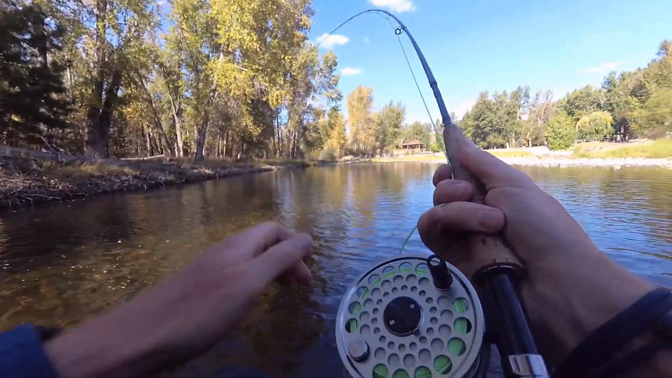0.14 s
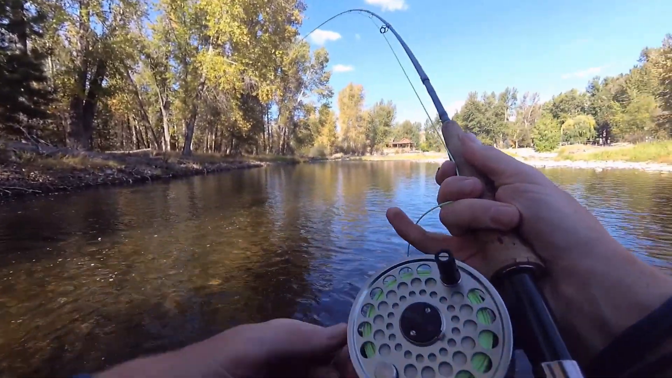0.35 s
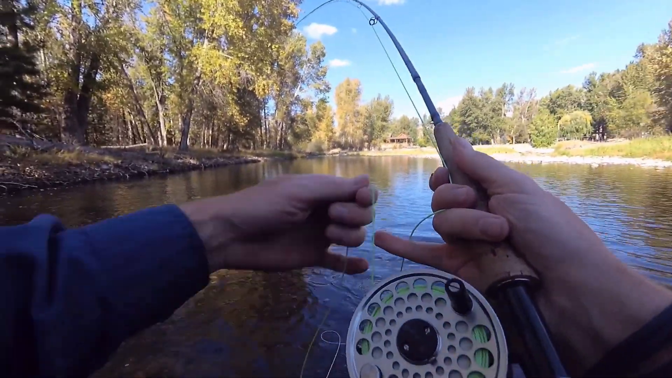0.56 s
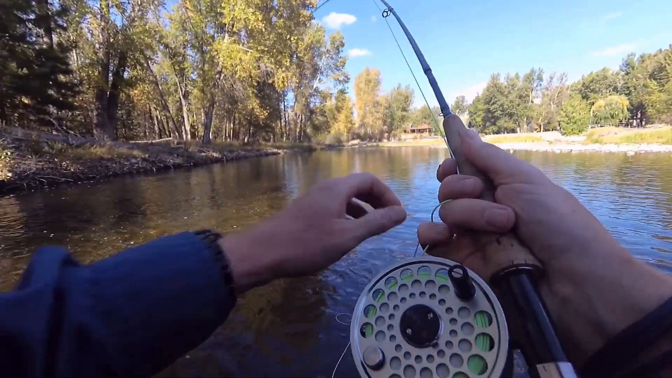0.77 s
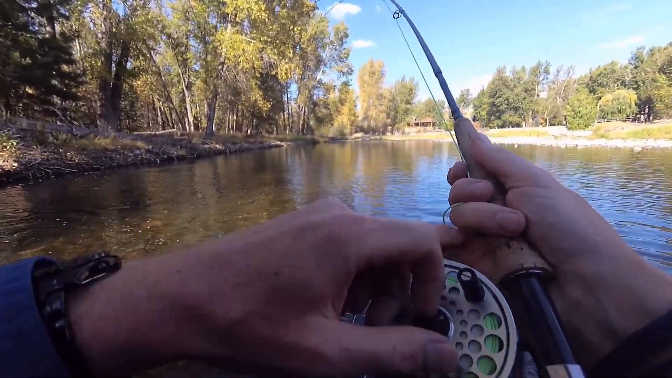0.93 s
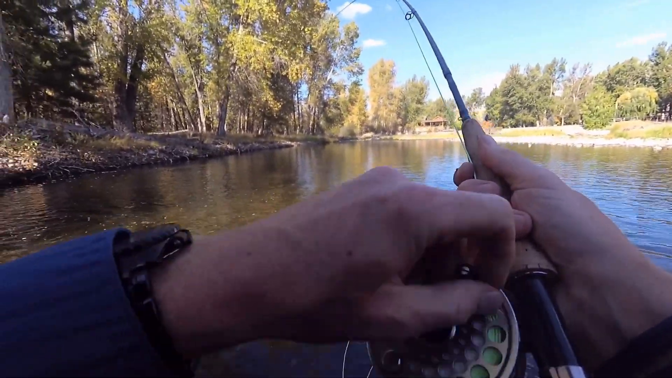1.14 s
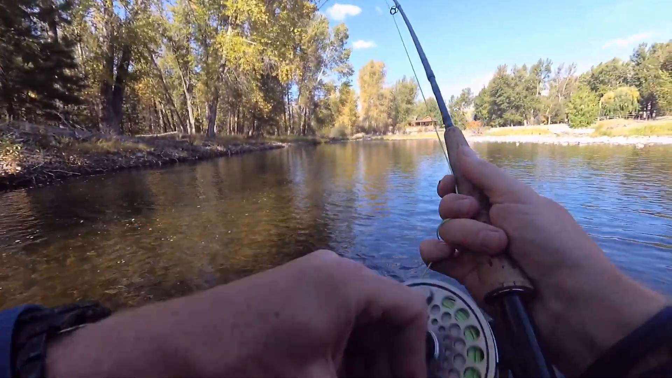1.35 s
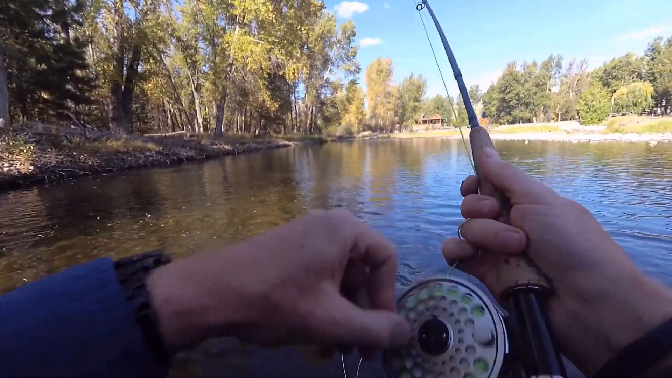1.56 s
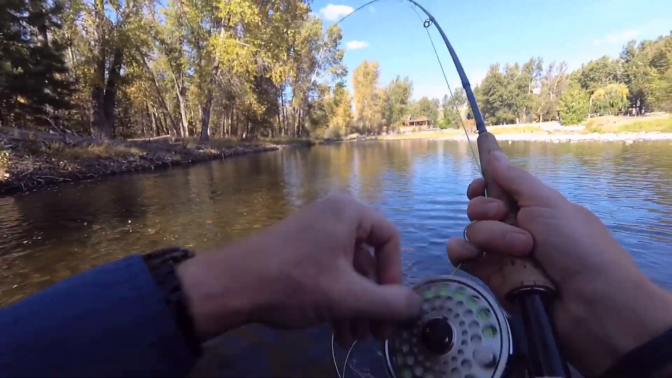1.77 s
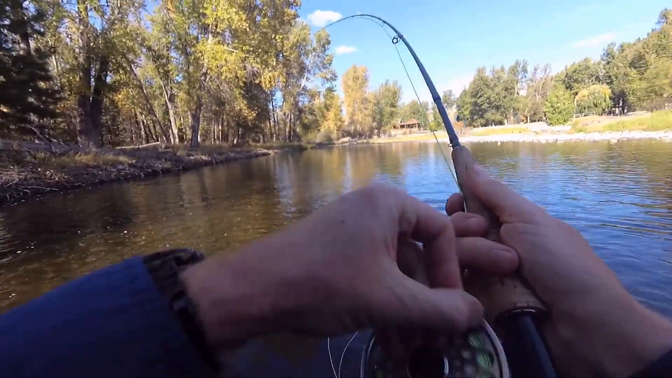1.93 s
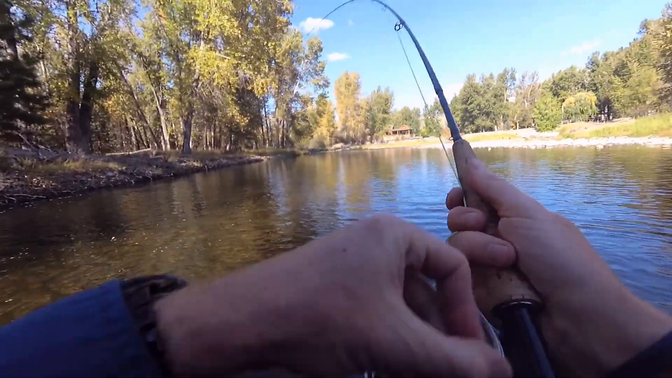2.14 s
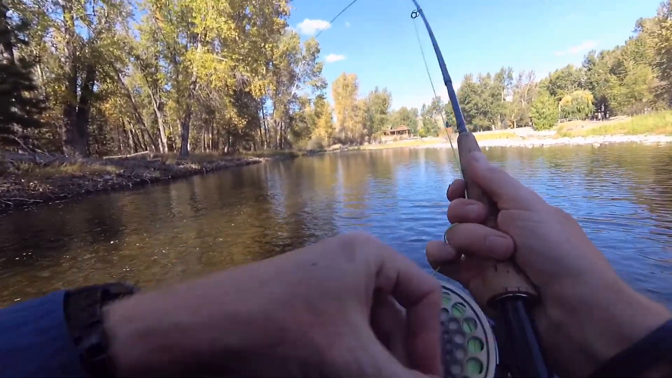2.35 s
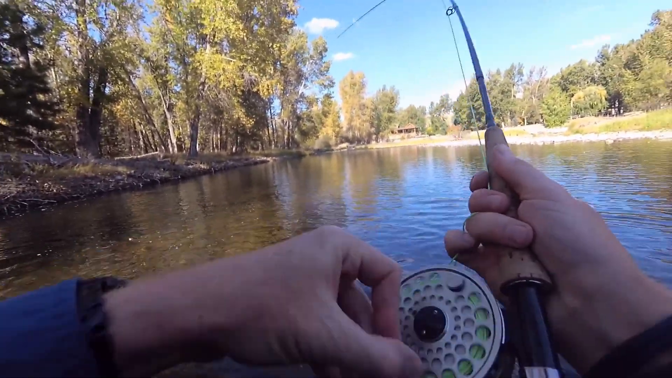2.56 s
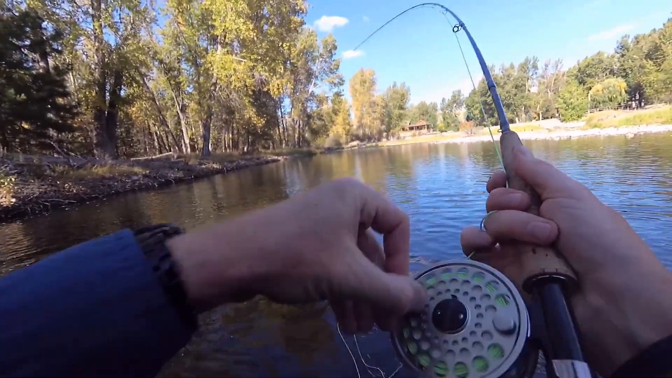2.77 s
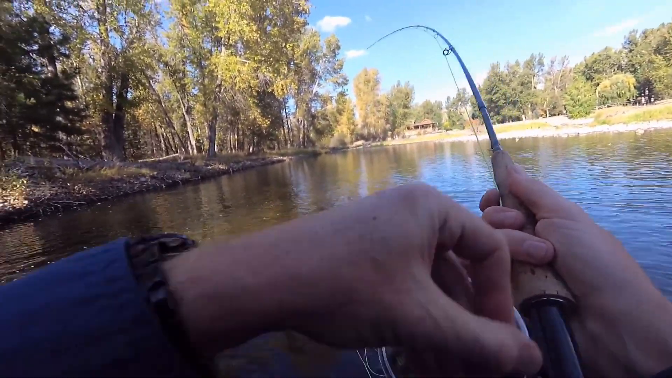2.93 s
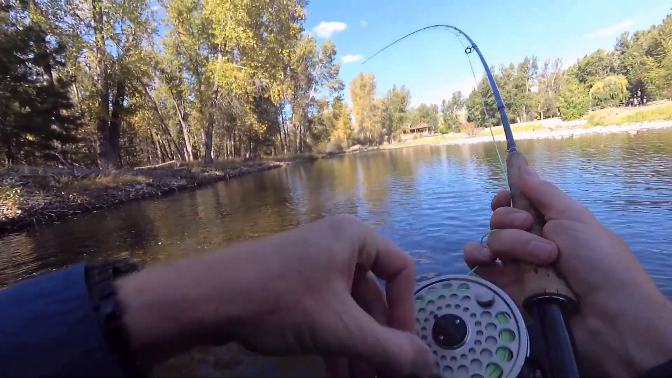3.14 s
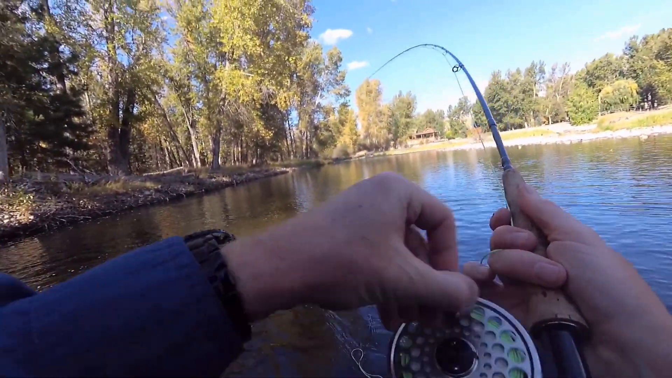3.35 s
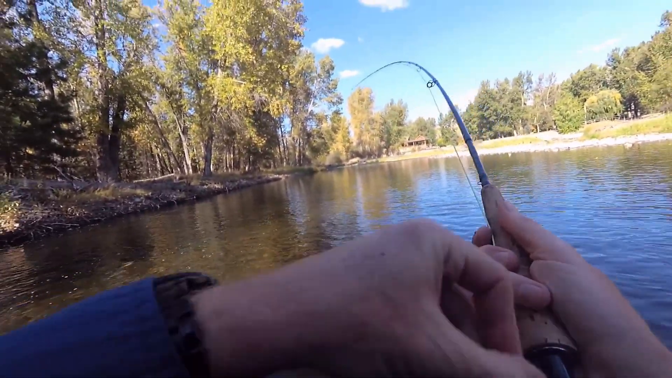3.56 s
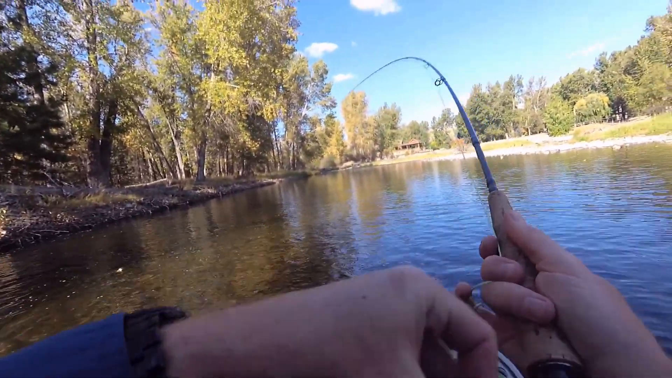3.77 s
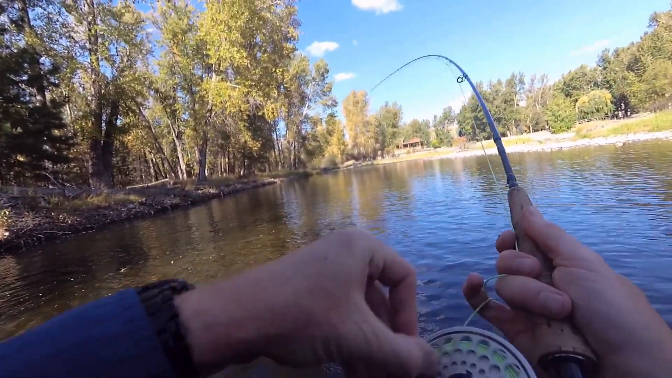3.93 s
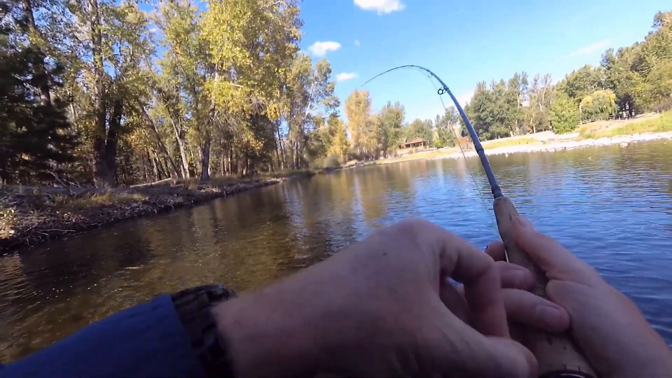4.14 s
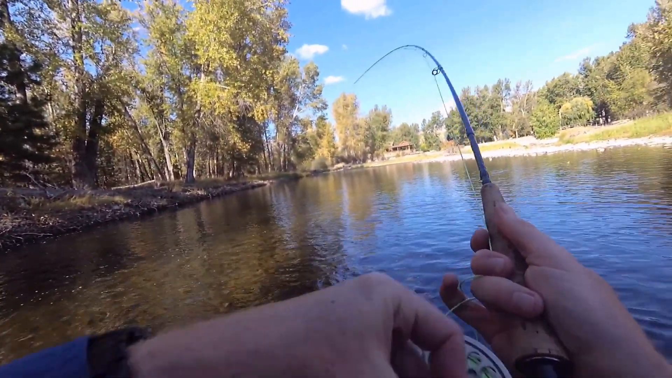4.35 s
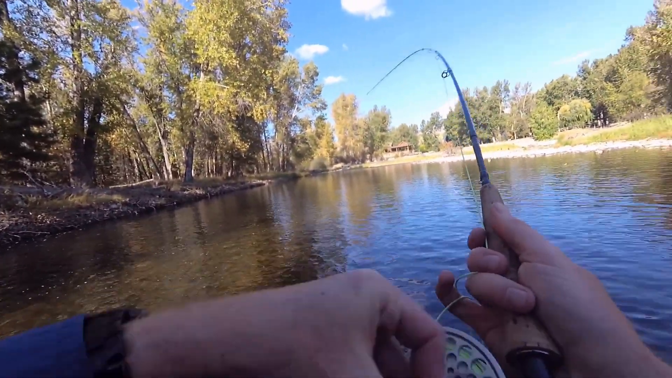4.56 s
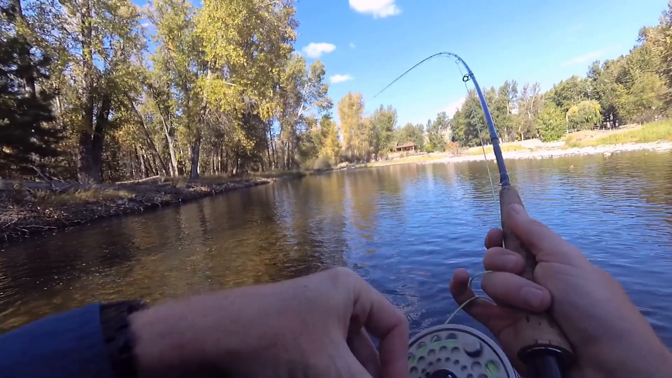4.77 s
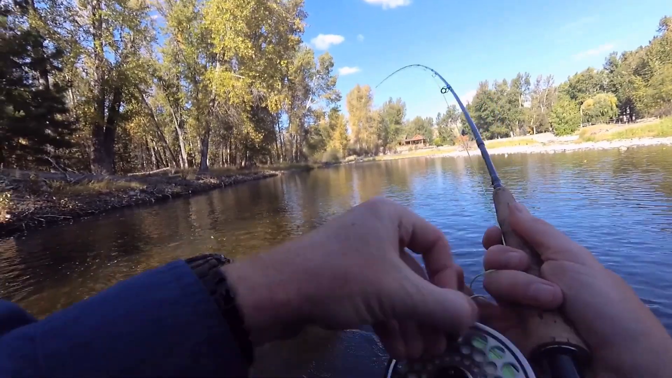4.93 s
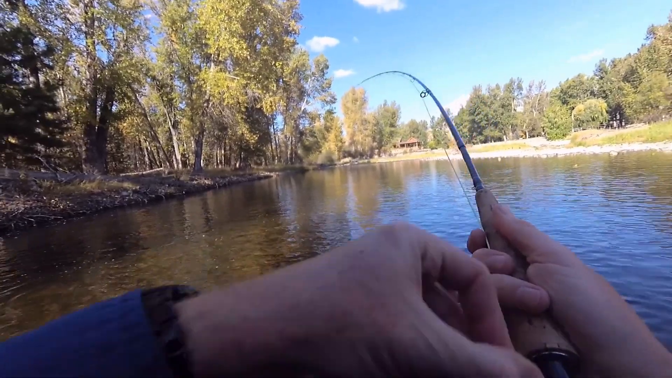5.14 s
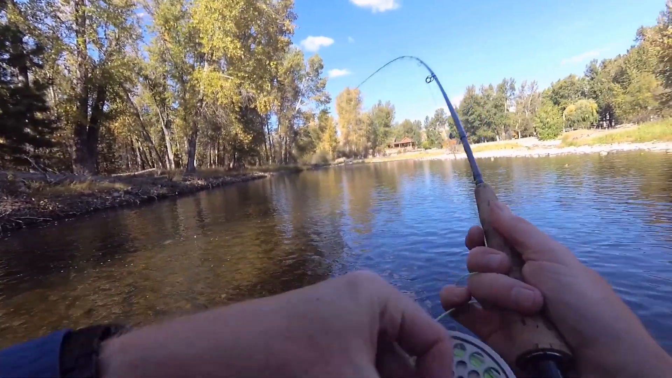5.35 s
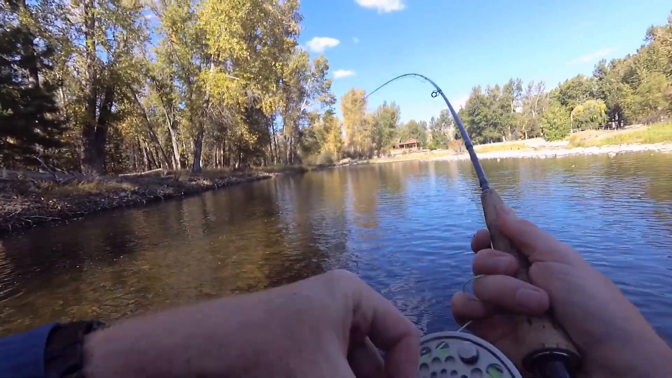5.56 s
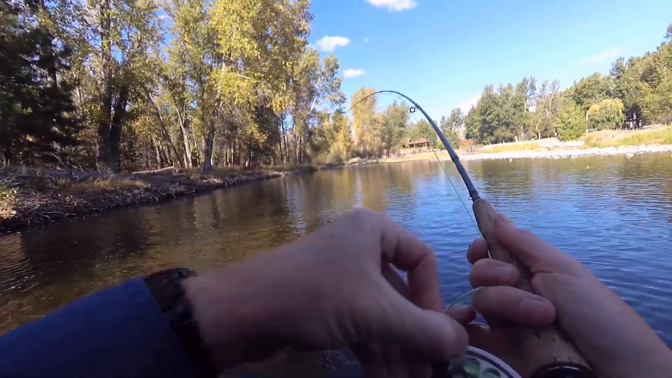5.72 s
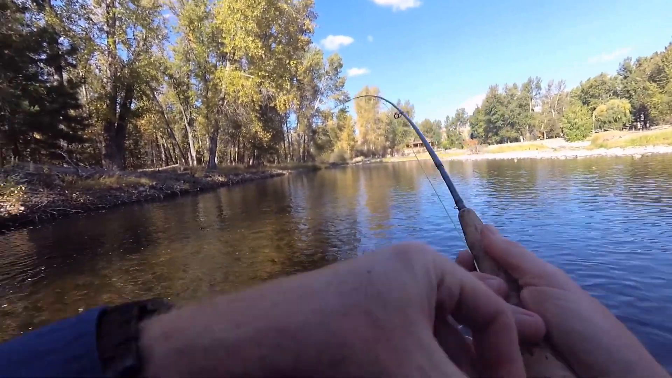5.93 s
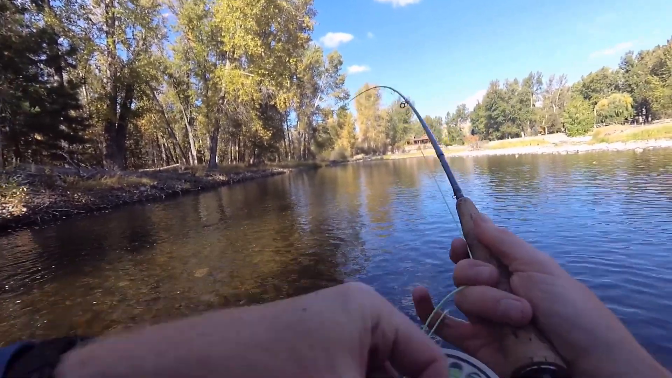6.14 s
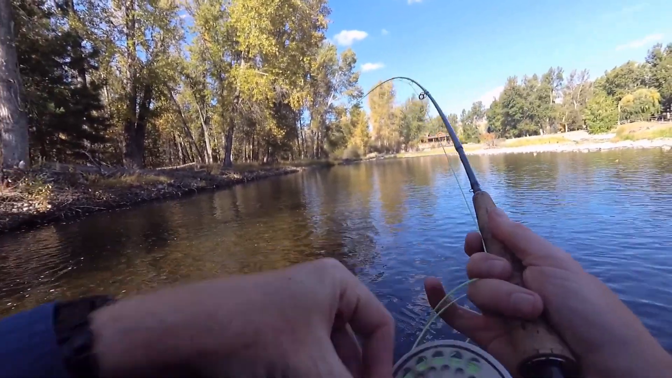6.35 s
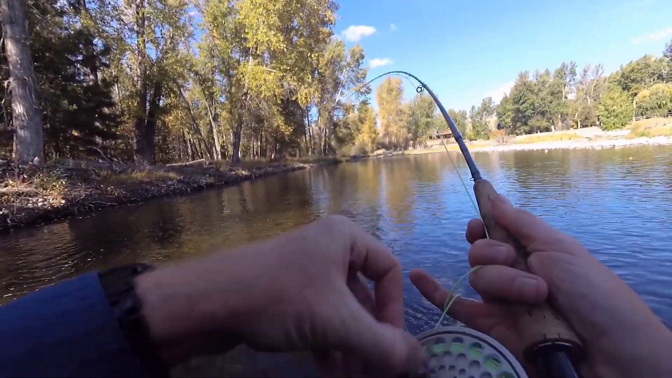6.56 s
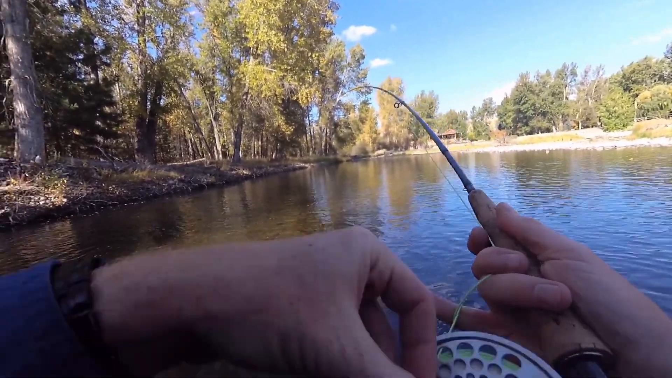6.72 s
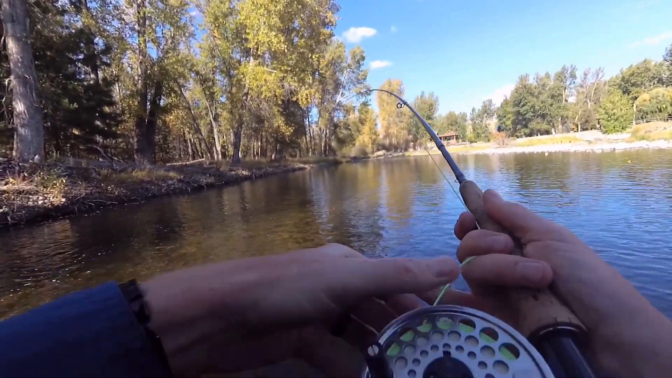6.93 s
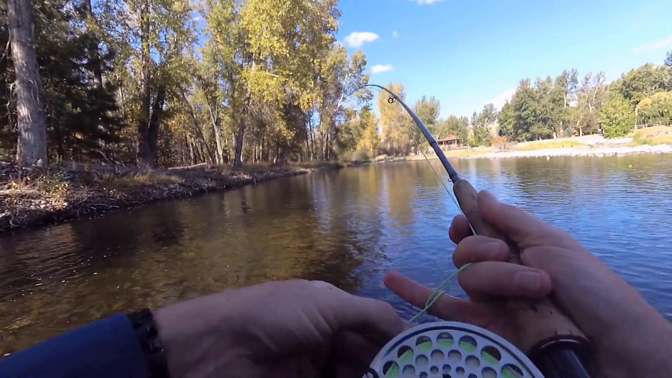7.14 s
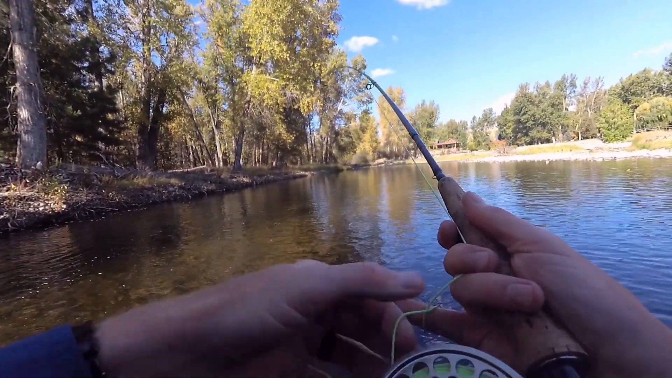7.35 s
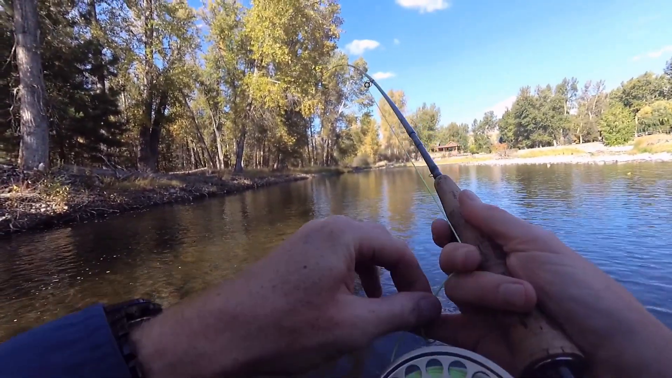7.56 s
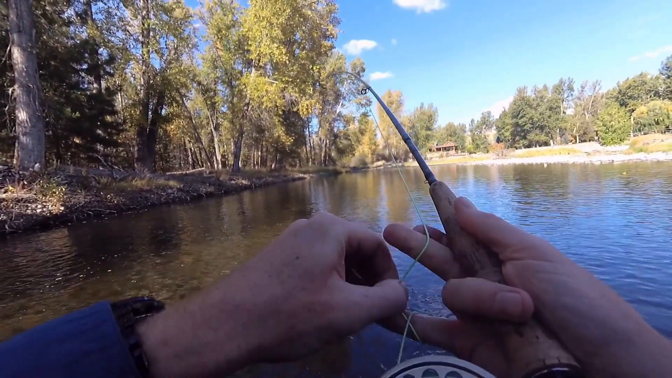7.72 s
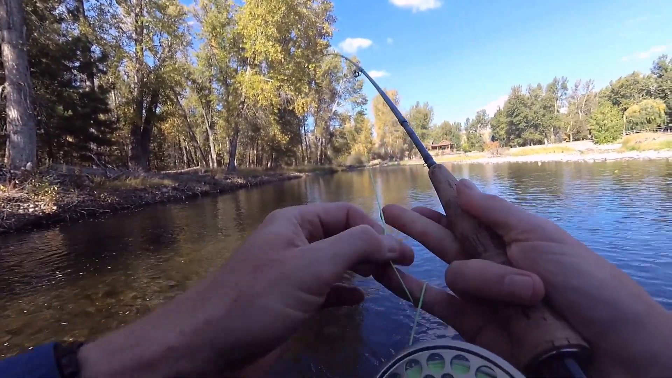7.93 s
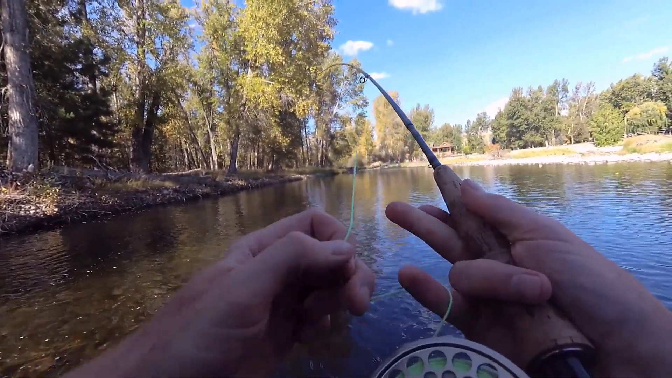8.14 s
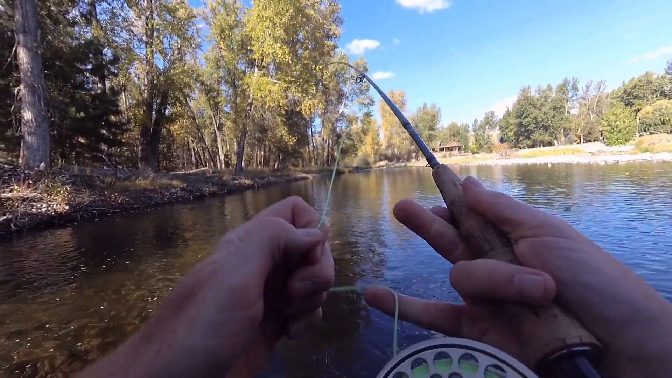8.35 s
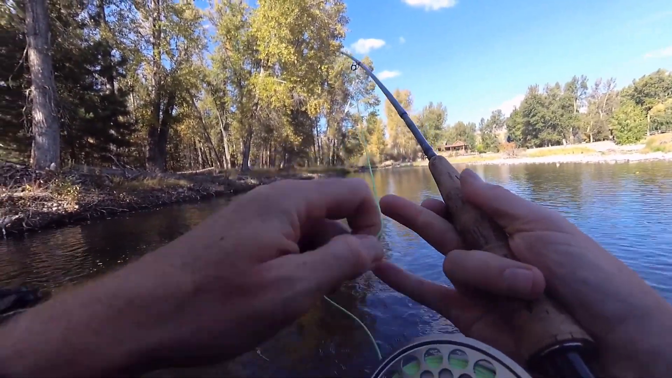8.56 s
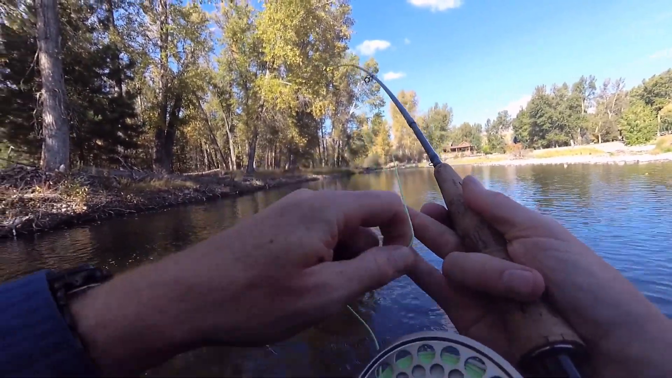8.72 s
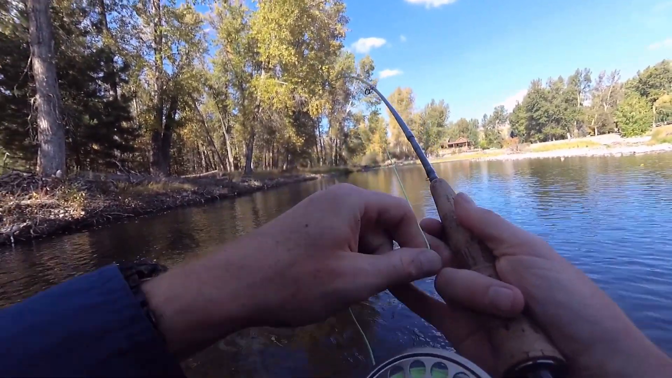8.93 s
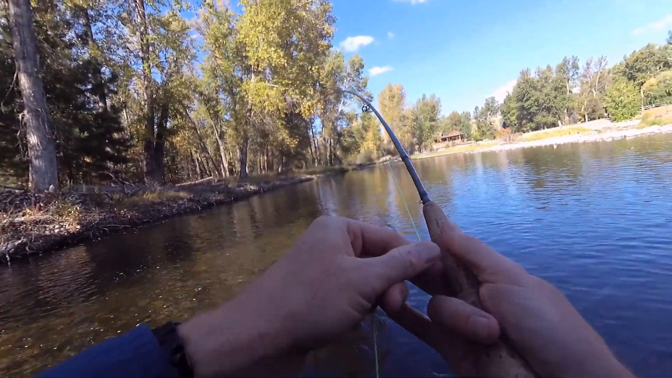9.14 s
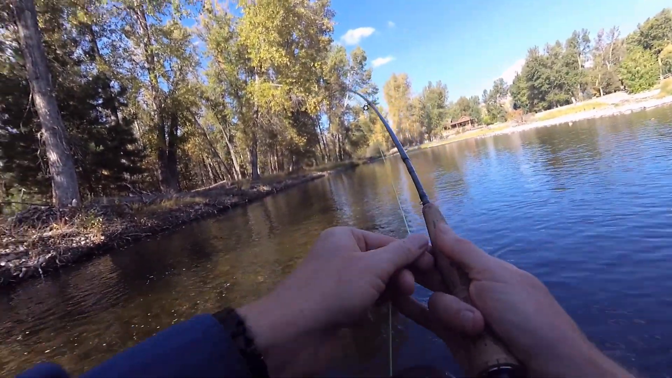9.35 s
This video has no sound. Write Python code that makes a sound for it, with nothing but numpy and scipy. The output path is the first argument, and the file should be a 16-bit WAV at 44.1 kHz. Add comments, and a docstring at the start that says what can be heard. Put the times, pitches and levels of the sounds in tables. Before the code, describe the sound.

Close to the microphone, small finger taps and a brushing sleeve come first over quiet flowing water. A bright ratcheting buzz then starts abruptly, roughly thirty to fifty clicks a second, its pace rippling with the cranking hand, with faint scraping and a few knocks. After it ends, a soft bump's aftermath gives way to steel tinks, taps, a short line swish and the river alone.

```python
"""Beside a steadily rushing river, an angler winds a click-and-pawl fly reel at arm's length from a body camera.
Each click is a short noise burst that rings the spool, rim and pawl; listed times slow at the crank's dead points.
Grainy noise makes the scrape between teeth, tiny ticks make the rattle, and falling tones make the crank knocks.
Noise bursts make the taps, slides and bumps of hands and sleeve, and steel tinks ring as fading sines.
The river is shaped noise whose bands swell separately, under a thin hiss."""
import sys
import numpy as np
from scipy import signal
from scipy.fft import rfft, irfft, next_fast_len
from scipy.io import wavfile
from scipy.ndimage import map_coordinates

SR = 44100
rng = np.random.default_rng(int(sys.argv[2]) if len(sys.argv) > 2 else 0)


def pcm_store(signal):
    """Save signal as 16-bit PCM."""
    levels = np.round(np.clip(np.atleast_2d(signal), -1, 1) * 32767)
    wavfile.write(sys.argv[1], SR, levels.astype(np.int16).T)


N = 414099

# resonances of the reel's spool: pitch_hz, width_hz, level_db (relative)
SPOOL_MODES = [(3000, 430, 2.5), (3400, 583, 2.5)]
# resonance of the spool's rim: pitch_hz, width_hz, level_db (relative)
RIM_MODES = [(4120, 250, 0.36)]
# side load on the spool, which changes the rubbing: time_s, rub_db (relative)
SIDE_LOAD = [(1.4, -6.5), (2.2, -2.5), (3.3, -5.5), (4.2, -3.5), (4.5, -0.5), (5.1, -2), (6.8, -5)]


def amp(db):
    """Turns decibels into a plain multiplier."""
    return 10 ** (np.asarray(db) / 20)


def unit(x):
    """Scales a sound to an rms of 1."""
    return x / np.sqrt(np.mean(x ** 2) + 1e-20)


def along(points, hz):
    """Reads a curve of (Hz, value) points on a log frequency axis."""
    f, v = np.transpose(points)
    return np.interp(np.log(hz + 1), np.log(f + 1), v)


def over_time(points):
    """Reads a curve of (second, value) points at every sample."""
    return np.interp(np.arange(N) / SR, *np.transpose(points))


def wobble(rate):
    """A smooth random curve with this many random knots a second."""
    knots = rng.standard_normal(int(N * rate / SR) + 4)
    return map_coordinates(knots, [np.arange(N) * rate / SR])


def filtered(x, response):
    """Multiplies the spectrum of x by a response, which may be complex."""
    n = x.shape[-1]
    m = next_fast_len(n + n // 8)  # spare room for the ringing
    return irfft(rfft(x, m) * response(np.fft.rfftfreq(m, 1 / SR)), m)[..., :n]


def resonances(modes, f):
    """Damped resonances that ring only after being struck, added with alternating signs."""
    total = 0
    for k, (centre, width, db) in enumerate(modes):
        damping = 1j * f * width
        total = total + (-1) ** k * amp(db) * damping / (centre * centre - f * f + damping)
    return total


def ports(pair, alike):
    """Mixes two unrelated signals into a left and right of a given likeness."""
    turn = np.arccos(np.clip(alike, -1, 1)) / 2
    return np.array([np.cos(turn) * pair[0] + sign * np.sin(turn) * pair[1] for sign in (1, -1)])


def add(out, s, sound):
    """Mixes a stereo sound in at time s."""
    part = out[:, max(round(s * SR), 0):][:, :sound.shape[-1]]
    part += sound[..., :part.shape[-1]]


def band(n, hz, width, alike=0.26):
    """Stereo noise of rms 1 in one band around hz."""
    noise = ports(rng.standard_normal((2, n)), alike)

    def hump(f):
        return f / np.hypot(f, hz / 2) / np.hypot(1, (2 * (f - hz) / width) ** 2)
    return unit(filtered(noise, hump))


def rush(colour):
    """Spread-out stereo noise of rms 1, nearly mono in the low middle."""
    # left-right likeness of the noise: pitch_hz, likeness (0 to 1)
    likeness = [(50, 0.13), (130, 0.86), (270, 0.99), (640, 0.97), (1400, 0.87), (3100, 0.26), (6800, 0.5),
                (15000, 1)]
    m = next_fast_len(N)
    hz = np.fft.rfftfreq(m, 1 / SR)
    pair = rfft(rng.standard_normal((2, m)))
    spectrum = ports(pair, along(likeness, hz)) * colour(hz)
    return unit(irfft(spectrum, m)[:, :N])


def river(flow_db=-39.0, hiss_db=-55.5, churn_db=1.5, count=4):
    """Water is a broad low rush whose octaves swell and sink separately, under a thin even hiss."""
    # tone colour of the rush: pitch_hz, level_db (per Hz, relative)
    flow_colour = [(30, -45), (60, -31), (110, -24.5), (170, -14), (260, -3.5), (420, -2), (620, -6.5),
                   (850, -11.5), (1050, -15.5), (1750, -18), (2200, -24), (3000, -32), (6000, -86)]
    # tone colour of the hiss: pitch_hz, level_db (per Hz, relative)
    hiss_colour = [(1200, -9), (2500, 8), (4000, 8.5), (6200, 3), (7500, 5.5), (9500, 5), (11000, 11.5),
                   (12200, 3), (15200, 5), (15900, -25)]
    flow = rush(lambda f: amp(along(flow_colour, f)))
    centres = 200 * 2 ** np.arange(count)  # Hz
    water = np.zeros((2, N))
    for share in np.eye(count):
        octave = filtered(flow, lambda f: np.interp(f, centres, share))
        water += octave * amp(churn_db * wobble(16))
    hiss = rush(lambda f: amp(along(hiss_colour, f)))
    return amp(flow_db) * water + amp(hiss_db) * hiss


def handling(lumps_db=4.0):
    """Arm movement shakes the camera with a faint lumpy rumble, different at each port."""
    # strength of the rumble, before its lumps: time_s, level_db
    rumble_level = [(.8, -58), (1.25, -85), (2.1, -70), (6.8, -56.5), (7.3, -69)]
    # rumble through the camera mount: pitch_hz, level_db (per Hz, relative)
    mount_colour = [(15, -19), (80, -2), (170, 8), (1000, -80)]
    noise = ports(rng.standard_normal((2, N)), 0.67)
    shake = filtered(noise, lambda f: amp(along(mount_colour, f)))
    return amp(over_time(rumble_level) + lumps_db * wobble(5.2)) * unit(shake)


def strokes(rows, grain_db, catch_rate):
    """Soft contacts are bands of noise that swell and fade, catching unevenly as they go."""
    out, t = np.zeros((2, N)), np.arange(SR) / SR - .5
    for s, db, half, hz, width in rows:
        noise = band(SR, hz, width, alike=.45)
        sound = amp(db) * np.exp(-(t / half) ** 2) * noise
        cut = max(round((.5 - s) * SR), 0)  # drop what falls before time zero
        add(out, s - .5, sound[:, cut:])
    return out * unit(amp(grain_db * wobble(catch_rate)))


def bumps():
    """The arm bumps the camera harness: short, low strokes."""
    # bumps, with levels before the unevenness: middle_s, level_db, half_length_s, pitch_hz, width_hz
    bump_rows = [(.83, -44, 0.026, 150, 110), (3.94, -45, 0.021, 192, 130), (6.518, -32.5, 0.029, 168, 106),
                 (6.665, -42, 0.04, 121, 80)]
    return strokes(bump_rows, grain_db=1, catch_rate=40)


def slides():
    """Line and sleeve slide with a fine-grained rustle."""
    # slides, with levels before the grain: middle_s, level_db, half_length_s, pitch_hz, width_hz
    slide_rows = [(.2, -51.5, 0.41, 10300, 9000), (.195, -53, 0.03, 12000, 6000),
                  (.33, -47, 0.14, 1300, 3240), (.75, -50, 0.09, 10500, 7250), (1, -56, 0.17, 10500, 9000),
                  (6.88, -54, 0.27, 7860, 10100), (7.234, -46.5, 0.017, 4530, 8100),
                  (7.89, -53, 0.016, 4500, 4000), (8.112, -42.5, 0.0088, 4740, 2600),
                  (8.128, -44, .0025, 4800, 4500), (8.2, -49.5, 0.03, 2800, 2600),
                  (9.22, -57.5, 0.11, 4000, 4000), (9.33, -55, 0.3, 12000, 9000)]
    return strokes(slide_rows, grain_db=2.5, catch_rate=700)


def taps(tap_db=-1, tap_strike=0.54, fade_s=0.015):
    """Fingers and line tap the rod; each blow rings one broad resonance, quickly damped by the hand."""
    # taps, with levels before tap_db: start_s, level_db, pitch_hz, width_hz
    tap_rows = [(.2, -27, 1490, 1160), (.393, -32, 8000, 6000), (.424, -31, 1890, 1400),
                (.6447, -30, 9500, 3000), (0.6459, -19.5, 5000, 1000), (0.654, -30, 1500, 2000),
                (0.668, -24.5, 895, 700), (0.6696, -32, 9000, 11000), (0.735, -34, 12500, 5000),
                (1.321, -34, 4800, 5100), (3.931, -23, 495, 800), (6.9022, -26.5, 9000, 12000),
                (6.9193, -28, 2460, 2000), (7.191, -27.5, 2680, 1890), (7.296, -36, 7000, 9000),
                (7.3093, -28, 1950, 800), (7.3104, -26.5, 5500, 3400), (7.415, -30.5, 2680, 2000),
                (7.568, -39, 3000, 2500), (7.8313, -35.5, 6000, 9000)]
    out, t = np.zeros((2, N)), np.arange(SR // 10) / SR
    fade = amp(-60 * t / fade_s)
    for s, db, hz, width in tap_rows:
        noise = ports(rng.standard_normal((2, len(t))), 0.39)
        blow = tap_strike * (t == 0) + noise * fade / np.linalg.norm(fade)

        def rod(f):
            skin = np.hypot(1, (f / (hz + 2 * width)) ** 2)  # soft skin rounds off the top
            return resonances([(hz, width, 0)], f) / skin
        tap = unit(filtered(blow, rod))
        add(out, s, amp(db + tap_db) * tap * np.sqrt(np.mean(fade ** 2)))
    return out


def tinks(tink_db=-5, contact_db=-5, contact_t60=0.037, attack=0.00021):
    """Small steel tackle parts ring briefly as fading sines, with a noisy touch on top."""
    # tinks, with levels before tink_db: start_s, level_db
    tink_rows = [(6.838, -30), (7.003, -19), (7.015, -27), (7.029, -21.5), (8.3016, -28)]
    # tones in each tink, before random level changes: pitch_hz, level_db, fade_s (to fall 60 dB)
    tink_tones = [(7100, -4, 0.031), (8120, -11, .06), (9620, -13, .045), (10300, -1.5, 0.024),
                  (13500, -12, .045)]
    out, t = np.zeros((2, N)), np.arange(SR // 10) / SR
    onset = 1 - np.exp(-t / attack)
    for s, db in tink_rows:
        ring = np.zeros((2, len(t)))
        for hz, level, t60 in tink_tones:
            uneven = 2 * rng.standard_normal((2, 1))  # dB, drawn for each side
            tone = np.sin(2 * np.pi * hz * t + 2 * np.pi * rng.random())
            ring += amp(level + uneven - 60 * t / t60) * tone
        contact = amp(contact_db - 60 * t / contact_t60) * band(len(t), 9500, 10000)
        add(out, s, amp(db + tink_db) * onset * (ring + contact))
    return out


def crank(start_hz=1790, drop_s=0.0044, rise_s=0.0015,
          crack_db=3, crack_fall=0.00036, crack_hz=4300, crack_width=3000):
    """The crank takes up its play with a knock that falls in pitch; harder knocks start with more crack."""
    # knocks of the crank: start_s, level_db (about the peak of the tone)
    knock_rows = [(4.7188, -20.5), (4.9667, -26.5), (5.2277, -31.5), (5.4748, -30), (6.7895, -32.5)]
    out, t = np.zeros((2, N)), np.arange(SR // 20) / SR
    swell = (t / rise_s * np.exp(1 - t / rise_s)) ** 2  # peaks at rise_s
    pitch = start_hz / (1 + (t / drop_s) ** 4)  # an octave down at drop_s
    knock = swell * np.sin(2 * np.pi * np.cumsum(pitch) / SR)
    crack_shape = t / crack_fall * np.exp(1 - t / crack_fall)
    hardest = max(db for s, db in knock_rows)
    for s, db in knock_rows:
        crack = amp(crack_db + db - hardest) * crack_shape * band(len(t), crack_hz, crack_width)
        add(out, s, amp(db) * (knock + crack))
    return out


def rattle(times, rattle_db=-45, scatter_db=5, life=0.00056, hz=11500, width=9000, count=3):
    """On its way to the next tooth the loose pawl rebounds a few times with tiny bright ticks."""
    gaps = np.diff(times)[:, None]
    at = (times[:-1, None] + rng.random((len(times) - 1, count)) * gaps).ravel()
    load_db = np.interp(at, *np.transpose(SIDE_LOAD))
    ticks = np.zeros(N)
    ticks[(at * SR).astype(int)] = amp(rattle_db + load_db + scatter_db * rng.standard_normal(len(at)))
    fading = signal.lfilter([1], [1, -np.exp(-1 / (life * SR))], ticks)
    return fading * band(N, hz, width)


def scrape(times, ring_db=-50, fizz_db=-43.5, speed_power=0.55, grain_db=6, patchy_db=3.0):
    """Between clicks the pawl rides the teeth: a grainy rub that grows with spool speed and load."""
    # steel rubbing on steel: pitch_hz, level_db (per Hz, relative)
    fizz_colour = [(500, -27), (1300, 8), (4000, 7.5), (6000, 4), (11500, 2), (14800, 1), (16000, -17)]
    now = np.arange(N) / SR
    pace = np.median(np.diff(times)) / np.abs(np.diff(times))  # 1 at the usual gap
    speed = np.interp(now, (times[1:] + times[:-1]) / 2, pace, left=0, right=0)
    load = amp(over_time(SIDE_LOAD))
    catches = amp(grain_db * wobble(550) + patchy_db * wobble(30))  # tiny catches of the rough steel
    grit = ports(rng.standard_normal((2, N)), 0.97) * catches
    ring = unit(filtered(grit, lambda f: resonances(SPOOL_MODES + RIM_MODES, f)))
    fizz = unit(filtered(grit, lambda f: amp(along(fizz_colour, f))))
    return load * speed ** speed_power * (amp(ring_db) * ring + amp(fizz_db) * fizz)


def ratchet(times, db, bright_db, pawl_db=-1, rise=0.00043, fall=0.0007,
            frame_strike=1.66, pawl_strike=1.1, chatter_db=-15.0, snap_chatter_db=-13,
            chatter_rise=0.00089, chatter_fall=0.0078, bounce_db=6,
            snap_db=-4.5, snap_spread=2.04, snap_tilt=0.035, alike=0.54, size=1280):
    """The pawl slips off each tooth and strikes: a tiny burst rings spool, rim and pawl, then chatters out."""
    # resonances of the pawl: pitch_hz, width_hz, level_db (relative)
    pawl_modes = [(7000, 520, 9), (7720, 1920, 2)]
    # a firmer hand damps the rim: time_s, rim_db (against the spool)
    grip = [(2.6, -1.5), (3.1, -5)]
    # the bare snap of steel on steel: pitch_hz, level_db (per Hz, relative)
    snap_colour = [(900, -2), (2100, -10), (2900, 8), (5000, 5), (6200, 7), (8900, 0), (9750, 6.5),
                   (10500, 2.5), (12500, 0), (14800, 2), (16000, -25)]
    lead = size // 4  # samples of slipping before the strike
    t = (np.arange(size) - lead) / SR
    hardness = amp(db - np.median(db))[:, None]  # hard strikes are cleaner and sharper
    bounces = np.repeat(amp(bounce_db * rng.standard_normal((len(times), size // 32))), 32, axis=1)
    chatter = np.exp(np.minimum(t / chatter_rise, -t / chatter_fall)) * unit(bounces)

    def levelled(x):
        """Gives every click the energy of 4 ms at rms 1."""
        energy = np.mean(np.sum(x ** 2, axis=2), axis=0)
        return x / np.sqrt(energy / (.004 * SR))[:, None]

    def ring(response, strike, loose_db=chatter_db, spread=1):
        """One part of the reel answers every strike."""
        slip = np.exp(np.minimum(t / rise, -t / fall) / spread)
        noise = ports(rng.standard_normal((len(times), 2, size)).swapaxes(0, 1), alike)
        burst = noise * (slip + amp(loose_db) * chatter) / np.linalg.norm(slip)
        return levelled(filtered(burst + strike * hardness * (t == 0), response))

    bright = amp(bright_db + pawl_db)[:, None]
    free = amp(np.interp(times, *np.transpose(grip)))[:, None]
    spool = ring(lambda f: resonances(SPOOL_MODES, f), frame_strike)
    rim = ring(lambda f: resonances(RIM_MODES, f), frame_strike)
    frame = (spool + free * rim) / np.hypot(1, free)
    pawl = ring(lambda f: resonances(pawl_modes, f), pawl_strike)
    body = (frame + bright * pawl) / np.hypot(1, bright)
    bare = ring(lambda f: amp(along(snap_colour, f)), 0, snap_chatter_db, snap_spread)
    snap = amp(snap_db) * bright ** snap_tilt * bare
    clicks = amp(db)[:, None] * levelled(body + snap)
    out = np.zeros((2, N))
    for k, s in enumerate(times):
        add(out, s - lead / SR, clicks[:, k])
    return out


def reel(echo_delay=0.00355, sway=0.00014, echo_db=-10.0, echo_top_hz=6200):
    """The reel sits a little to the right; a dull reflection off the angler shifts as the arm sways."""
    # pawl drops, ten teeth a turn, before echo and side balance: strike_s, level_db (over 4 ms),
    # brightness_db (pawl ring against spool ring, before pawl_db)
    click_rows = [(1.3823, -25.0, 0.0), (1.4199, -24.5, 5.0), (1.454, -22.0, 2.0), (1.4816, -23.0, -1.0),
                  (1.5062, -23.0, -4.0), (1.5313, -23.0, 4.0), (1.5656, -24.0, 8.0), (1.6002, -27.5, -10.0),
                  (1.6287, -25.5, -1.0), (1.653, -24.5, -2.0), (1.6766, -23.0, -2.0), (1.6994, -24.0, 3.0),
                  (1.7197, -22.5, 0.0), (1.7395, -25.0, -7.0), (1.7627, -24.0, -8.0), (1.7967, -20.5, 0.0),
                  (1.8313, -28.5, 2.0), (1.856, -27.0, 2.0), (1.8794, -26.0, 6.0), (1.9002, -24.5, 10.0),
                  (1.9205, -21.5, 8.0), (1.9449, -24.5, -2.0), (1.9659, -24.0, -1.0), (1.9837, -24.5, -3.0),
                  (2.0034, -24.0, -6.0), (2.0274, -22.5, -5.0), (2.0573, -18.0, 13.0),
                  (2.0848, -26.0, -2.0), (2.1069, -26.5, 7.0), (2.1271, -26.5, -3.0), (2.1509, -23.0, 1.0),
                  (2.1765, -24.5, 7.0), (2.1966, -23.5, -1.0), (2.2141, -22.5, -2.0), (2.2335, -26.0, 3.0),
                  (2.2589, -24.5, -3.0), (2.2937, -25.0, 7.0), (2.3234, -26.0, 2.0), (2.3466, -26.0, 3.0),
                  (2.3652, -24.0, 6.0), (2.3851, -22.0, 5.0), (2.4097, -25.0, -5.0), (2.4291, -24.5, -1.0),
                  (2.4462, -23.0, -8.0), (2.4669, -26.5, -8.0), (2.4962, -24.0, -4.0), (2.5386, -23.5, 6.0),
                  (2.5658, -24.5, 5.0), (2.5873, -26.5, 0.0), (2.6064, -23.5, 7.0), (2.6288, -23.5, 3.0),
                  (2.6548, -25.0, 2.0), (2.6758, -25.5, -3.0), (2.6953, -25.5, 1.0), (2.7185, -23.0, 2.0),
                  (2.75, -24.5, -4.0), (2.7918, -22.0, 13.0), (2.8209, -27.0, 2.0), (2.8461, -26.5, -1.0),
                  (2.8688, -26.0, -1.0), (2.8971, -23.0, 6.0), (2.9295, -26.5, -5.0),
                  (2.9543, -25.5, -10.0), (2.9796, -26.5, -6.0), (3.0075, -25.0, -2.0),
                  (3.0515, -23.0, 4.0), (3.0979, -24.5, 7.0), (3.1283, -27.0, 1.0), (3.1554, -27.0, 3.0),
                  (3.1834, -27.0, 1.0), (3.2154, -26.5, -2.0), (3.2471, -27.5, -3.0), (3.272, -27.0, -9.0),
                  (3.2966, -27.5, -14.0), (3.3269, -26.5, -1.0), (3.3648, -24.5, 1.0),
                  (3.4054, -24.5, 11.0), (3.4375, -28.5, 1.0), (3.4654, -28.0, -3.0), (3.4895, -27.0, 4.0),
                  (3.5152, -26.5, -9.0), (3.5493, -26.0, -11.0), (3.5737, -25.5, -8.0),
                  (3.5947, -26.0, -7.0), (3.618, -26.0, -4.0), (3.6472, -24.0, 3.0), (3.6885, -24.5, 4.0),
                  (3.7159, -26.0, 0.0), (3.7392, -28.0, -5.0), (3.7628, -26.0, 3.0), (3.7956, -26.5, -3.0),
                  (3.8302, -25.5, -12.0), (3.853, -24.5, -9.0), (3.8745, -26.5, -6.0),
                  (3.8971, -25.0, -5.0), (3.9236, -25.5, 0.0), (3.9584, -27.5, 4.0), (3.9896, -27.0, 2.0),
                  (4.0161, -29.5, -4.0), (4.0416, -27.0, -3.0), (4.077, -25.5, -4.0), (4.1084, -25.5, -5.0),
                  (4.1324, -26.5, -12.0), (4.1561, -27.5, -9.0), (4.1805, -25.0, -5.0),
                  (4.2165, -23.5, 0.0), (4.2588, -24.5, 5.0), (4.2886, -29.0, 0.0), (4.313, -30.5, -9.0),
                  (4.3371, -27.0, -3.0), (4.3668, -26.0, -2.0), (4.3978, -25.5, -10.0),
                  (4.4198, -26.0, -11.0), (4.4396, -24.5, -12.0), (4.4624, -24.5, -2.0),
                  (4.494, -23.0, -4.0), (4.5312, -25.0, 3.0), (4.5576, -26.5, 4.0), (4.581, -28.0, -10.0),
                  (4.5999, -24.5, -4.0), (4.621, -25.5, -7.0), (4.6487, -26.0, -12.0),
                  (4.6697, -25.5, -6.0), (4.6869, -25.0, -14.0), (4.7073, -25.0, -2.0),
                  (4.7414, -26.0, -4.0), (4.7813, -27.0, 4.0), (4.8063, -25.0, 4.0), (4.8278, -27.5, -10.0),
                  (4.8468, -27.5, 0.0), (4.871, -24.5, -6.0), (4.9039, -25.0, -15.0), (4.9243, -25.5, -6.0),
                  (4.9415, -23.5, -9.0), (4.9611, -23.5, -2.0), (4.9903, -24.5, 0.0), (5.0305, -27.5, 6.0),
                  (5.0585, -28.0, -2.0), (5.0803, -28.0, -4.0), (5.1006, -26.5, -4.0),
                  (5.1249, -26.5, -10.0), (5.1569, -25.5, -17.0), (5.1786, -23.5, -9.0),
                  (5.1971, -24.5, -11.0), (5.2188, -25.5, -3.0), (5.2469, -22.0, -1.0),
                  (5.2871, -24.5, 5.0), (5.3148, -25.0, 0.0), (5.3374, -27.5, -10.0), (5.3565, -27.5, -6.0),
                  (5.3817, -25.0, -11.0), (5.4123, -26.0, -11.0), (5.4323, -25.0, -1.0),
                  (5.4512, -25.5, -10.0), (5.4793, -27.0, -3.0), (5.5146, -25.0, -3.0),
                  (5.5524, -26.0, 6.0), (5.5786, -27.5, 1.0), (5.6054, -28.0, -5.0), (5.6276, -26.0, -2.0),
                  (5.6527, -26.0, -4.0), (5.6795, -26.0, -14.0), (5.7005, -26.0, -12.0),
                  (5.7221, -28.0, -9.0), (5.7519, -25.5, -2.0), (5.7886, -23.5, 3.0), (5.8229, -27.0, 1.0),
                  (5.8493, -26.5, -1.0), (5.8747, -27.0, -4.0), (5.8958, -26.0, -8.0),
                  (5.9233, -26.0, -4.0), (5.9531, -25.0, -7.0), (5.9765, -25.5, -6.0),
                  (5.9995, -26.5, -12.0), (6.0282, -25.0, -7.0), (6.0636, -23.0, -3.0),
                  (6.0967, -27.5, -4.0), (6.123, -28.0, -7.0), (6.1478, -30.0, -9.0), (6.1715, -25.0, -5.0),
                  (6.2022, -25.0, -7.0), (6.2327, -27.5, -10.0), (6.2526, -26.5, -11.0),
                  (6.2726, -24.5, -7.0), (6.2957, -26.0, -9.0), (6.3251, -24.5, -7.0),
                  (6.3575, -28.5, -6.0), (6.3854, -27.5, -5.0), (6.4099, -27.5, -11.0),
                  (6.4312, -25.0, -4.0), (6.4581, -25.0, -7.0), (6.4882, -26.0, -10.0),
                  (6.5101, -26.5, -11.0), (6.5309, -24.5, -6.0), (6.5532, -26.0, -12.0),
                  (6.5803, -23.5, -2.0), (6.6137, -28.0, -1.0), (6.6406, -27.0, -8.0),
                  (6.6634, -28.0, -10.0), (6.6861, -26.0, -3.0), (6.7174, -25.0, -9.0),
                  (6.752, -25.5, -12.0), (6.7758, -25.0, -10.0), (6.7991, -24.0, -7.0)]
    # side balance on the way to the two ports: pitch_hz, left_minus_right_db
    side_balance = [(1500, -1), (3100, -5), (4100, -2), (5500, 1), (7100, -3.5), (9000, -0.5),
                    (14000, -1.5)]
    # timing between the two ports: pitch_hz, left_lead_radians
    side_phase = [(1500, 1.2), (2700, -0.79), (3400, -0.92), (3950, 1.55), (5000, -0.89), (7300, -0.87),
                  (8800, 0.033)]

    def path(f):
        half = amp(along(side_balance, f) / 2) * np.exp(.5j * along(side_phase, f))
        return np.array([half, 1 / half])
    times, db, bright_db = np.transpose(click_rows)
    direct = ratchet(times, db, bright_db) + scrape(times) + rattle(times)
    dull = filtered(direct, lambda f: 1 / (1 + (f / echo_top_hz) ** 4))
    now = np.arange(N) / SR
    earlier = now - echo_delay - sway * wobble(1.98)
    echo = np.array([np.interp(earlier, now, side) for side in dull])
    return filtered(direct + amp(echo_db) * echo, path)


def scene():
    """The river all around, with hands and reel close by."""
    hands = handling() + bumps() + slides() + taps() + tinks()
    return river() + hands + crank() + reel()


def record(dry, top_hz=16000):
    """The camera cuts off steeply above its band limit."""
    return filtered(dry, lambda hz: 1 / np.sqrt(1 + (hz / top_hz) ** 120))


dry = scene()
out = record(dry)
pcm_store(out)
```